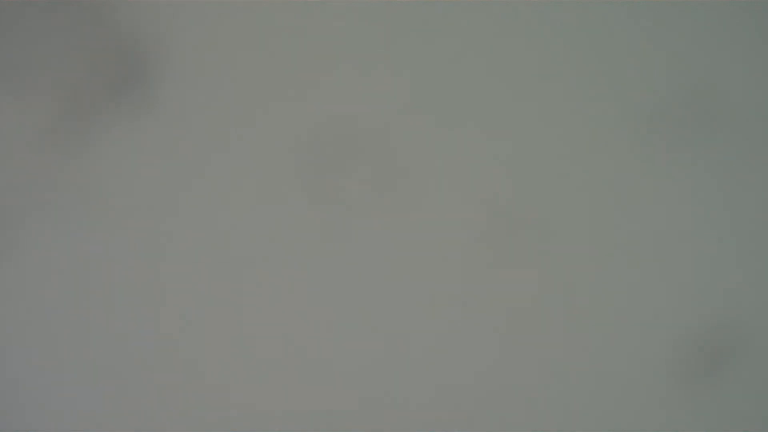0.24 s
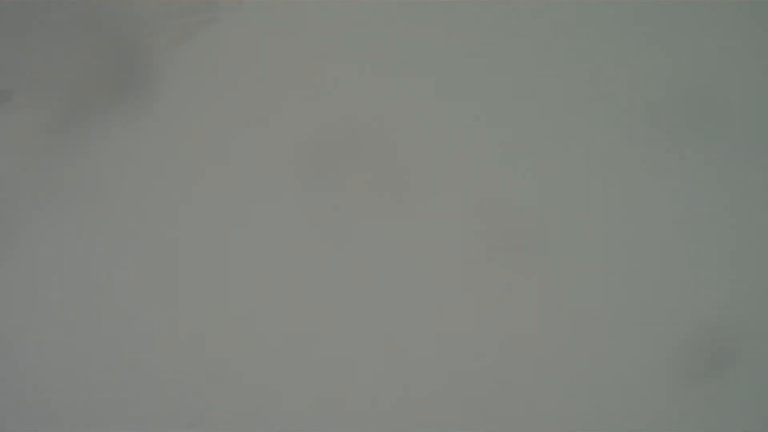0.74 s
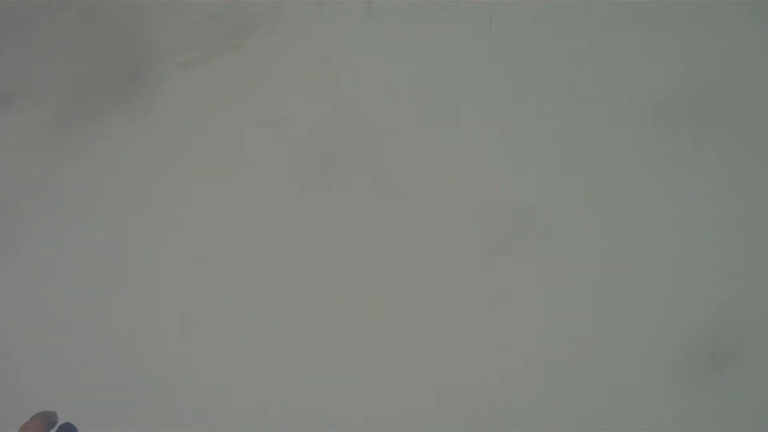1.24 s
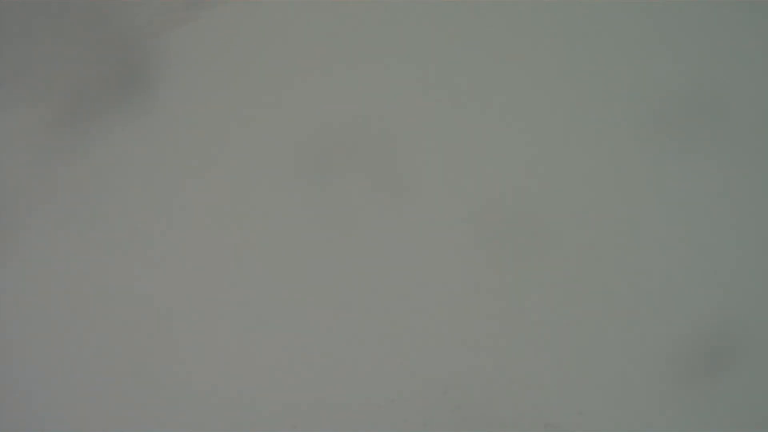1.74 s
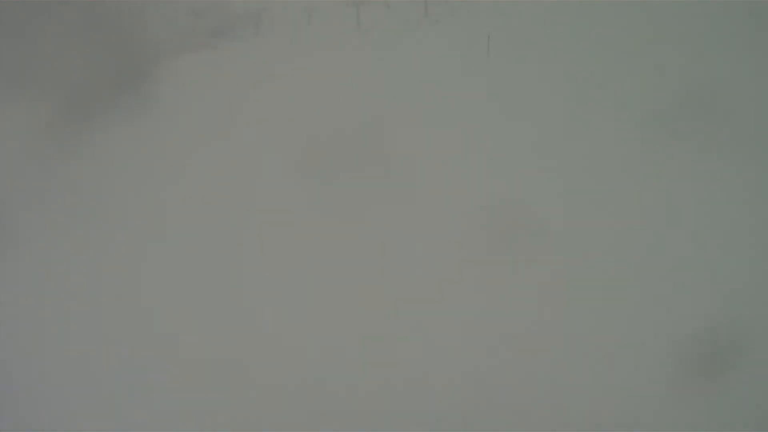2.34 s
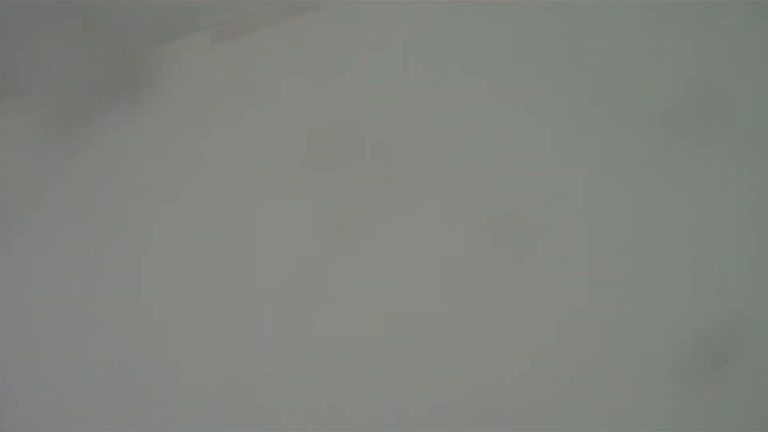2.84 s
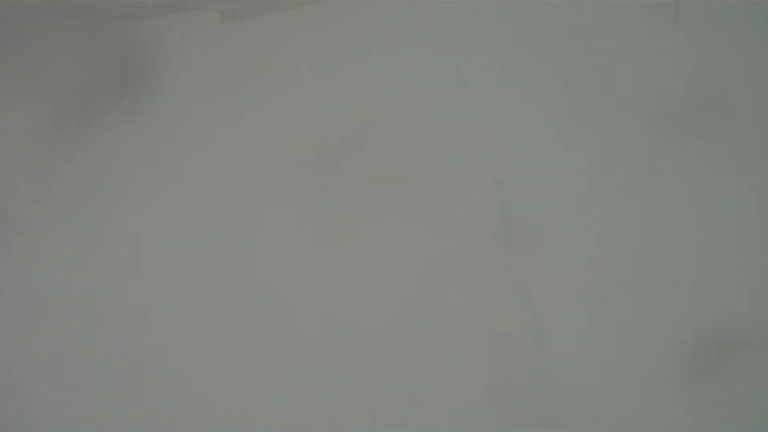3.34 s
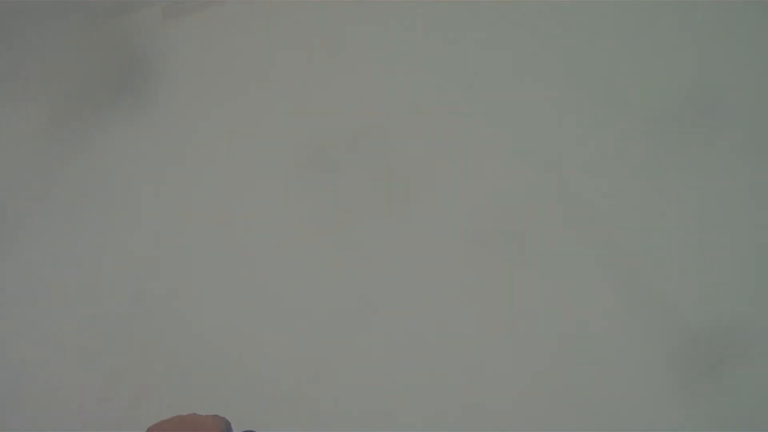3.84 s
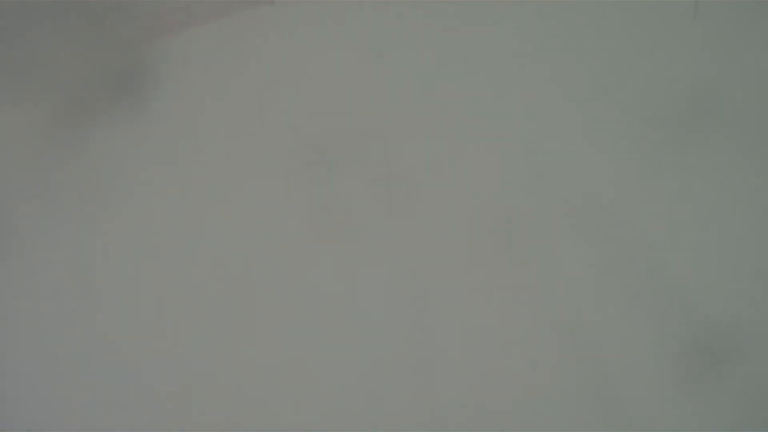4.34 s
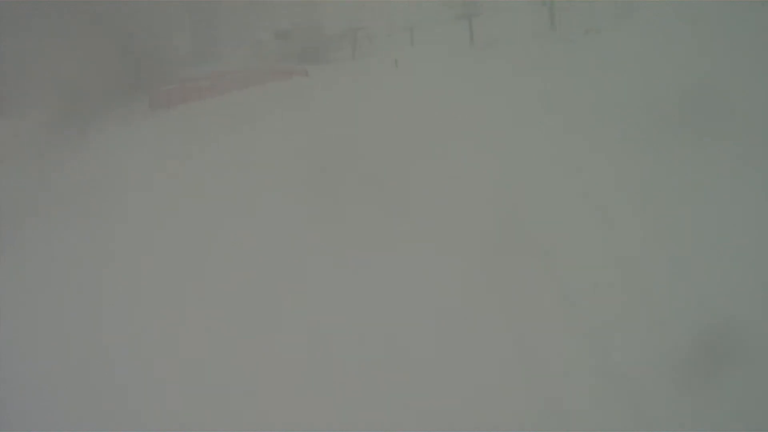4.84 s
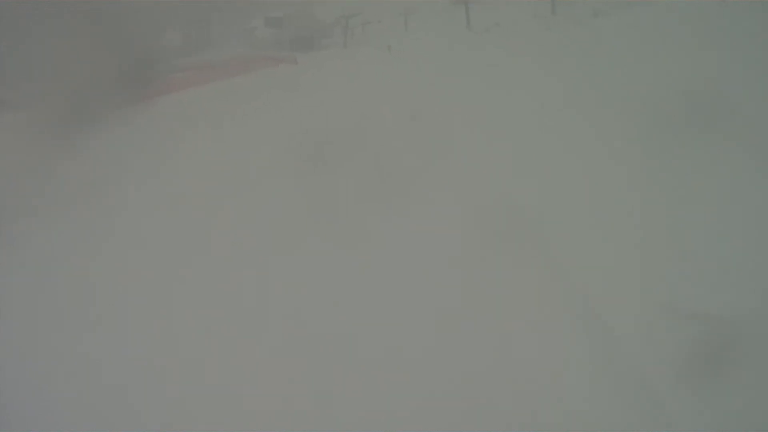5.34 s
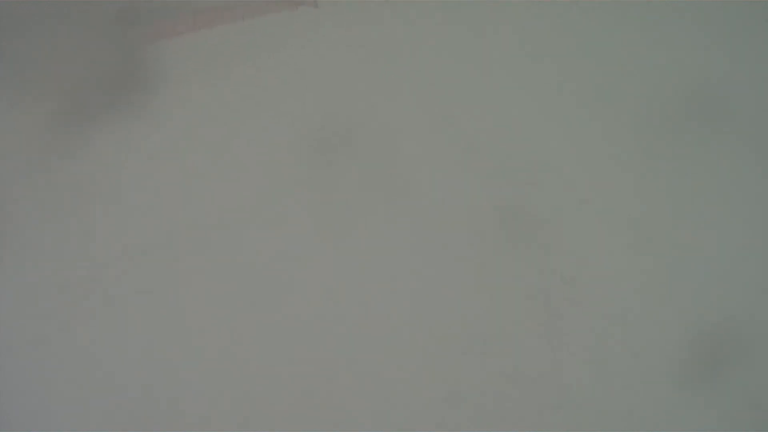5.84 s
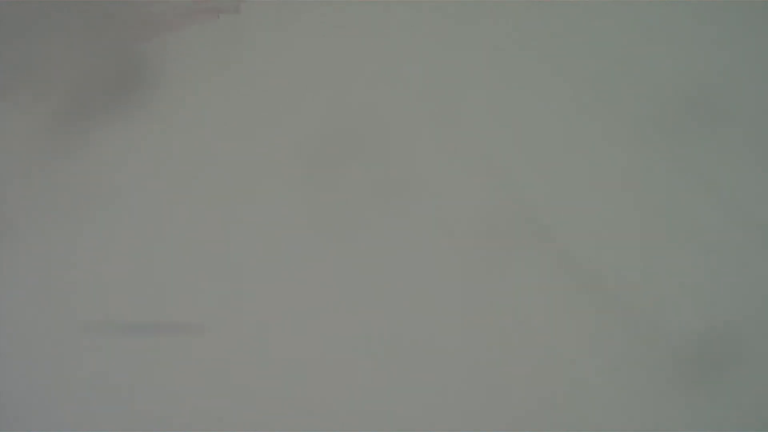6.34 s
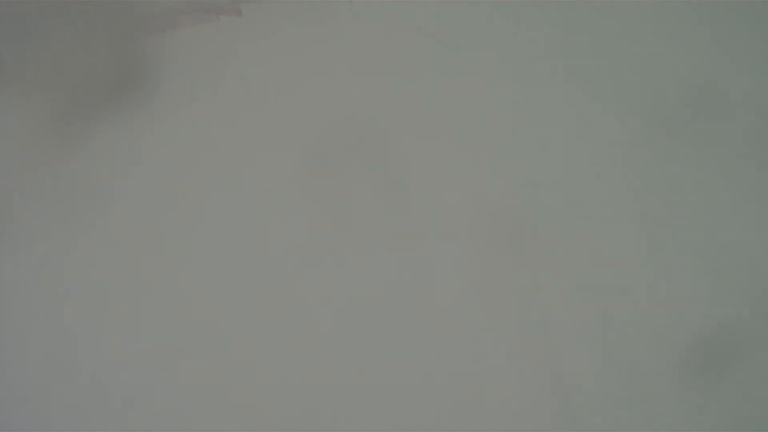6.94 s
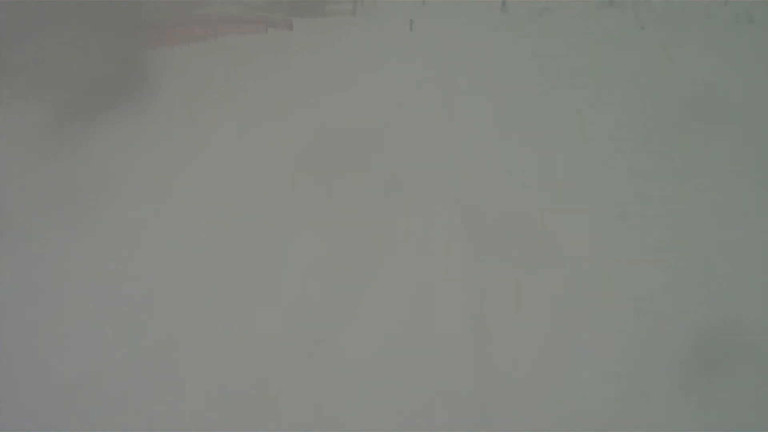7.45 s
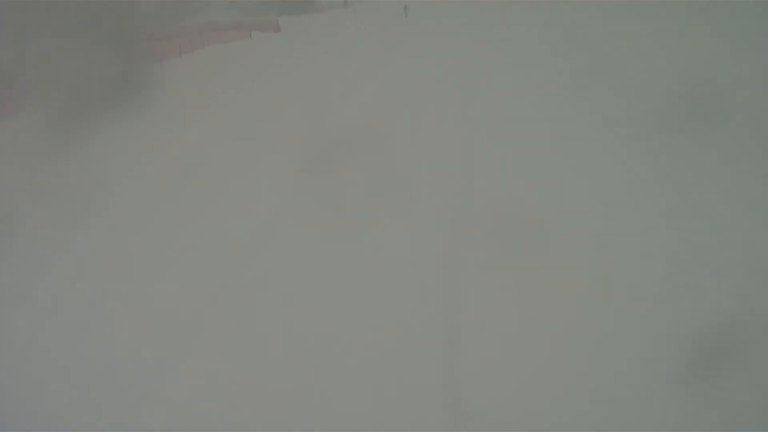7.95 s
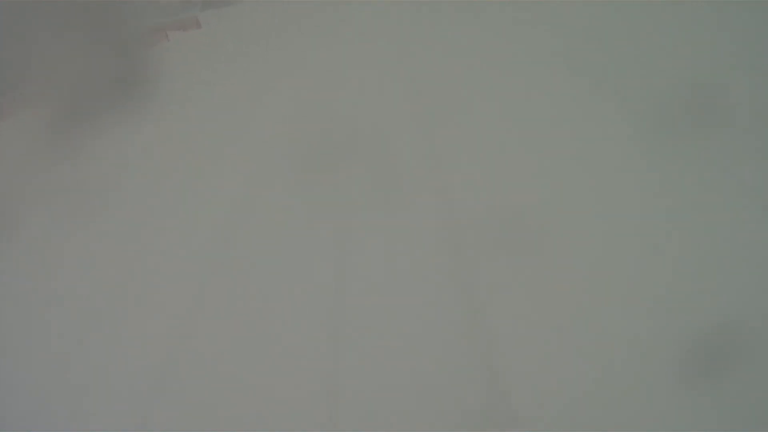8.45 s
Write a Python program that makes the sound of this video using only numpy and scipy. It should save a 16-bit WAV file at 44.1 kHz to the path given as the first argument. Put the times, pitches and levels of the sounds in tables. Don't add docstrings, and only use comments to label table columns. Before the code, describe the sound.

A snowboard scrapes over crusty snow with brittle crackles and a thin hiss, low wind rumble, and hard knocks near two seconds, heard through a sealed housing.

```python
import sys
import numpy as np
from scipy import signal
from scipy.io import wavfile
from scipy.ndimage import uniform_filter1d

SR = 44100
rng = np.random.default_rng(int(sys.argv[2]) if len(sys.argv) > 2 else 0)


def int16_out(signal):
    q = np.round(np.clip(np.atleast_2d(signal).T, -1, 1) * 32767)
    wavfile.write(sys.argv[1], SR, q.astype(np.int16))


def field_ratio(decibels):
    return 10 ** (np.asarray(decibels, dtype=float) / 20)


N = 383669


def rms_one(x):
    return x / np.sqrt(np.mean(x ** 2) + 1e-20)


def noise():
    return rng.standard_normal(N)


def in_time(rows):
    s, db = np.transpose(rows)
    return np.interp(np.arange(N) / SR, s, db)


def drift(rate_hz):
    r = np.exp(-80 * np.pi * rate_hz / SR)
    slow = signal.lfilter([1], [1, -2 * r, r * r], rng.standard_normal(N // 40 + 2002))[2000:]
    return np.interp(np.arange(N) / 40, np.arange(len(slow)), rms_one(slow))


def evened(x, window_s):
    power = uniform_filter1d(rms_one(x) ** 2 + 0.05, round(window_s * SR))
    return rms_one(x / power ** 0.17)


def resonance(x, hz, width_hz):
    r = np.exp(-np.pi * width_hz / SR)
    poles = [1, -2 * r * np.cos(2 * np.pi * hz / SR), r * r]
    return signal.lfilter([(1 - r * r) / 2, 0, (r * r - 1) / 2], poles, x)


def add(out, s, x):
    at = round(s * SR)
    out[at:at + len(x)] += x[:N - at]


# (frequency [Hz], width [Hz], level [dB])
HOUSING_MODES = [(600, 66, -14), (808, 160, -16.5), (1276, 153, -4), (1616, 190, -5), (1998, 474, -2.5),
                 (2435, 660, -1.5), (2800, 633, -4), (3572, 243, -5), (4470, 1200, -6.5), (4854, 1106, -5),
                 (5405, 417, -10.5)]


def housing(x):
    out = 0
    for k, (hz, width_hz, db) in enumerate(HOUSING_MODES):
        out = out + (-1) ** k * field_ratio(db) * resonance(x, hz, width_hz)
    return out


# (time [s], level [dB])
EDGE_LOAD = [(0, -38), (1.0, -38), (1.5, -40), (1.9, -35), (2.18, -46), (2.42, -35.5), (2.55, -42),
             (3.3, -42), (4.1, -39), (5.3, -42), (5.64, -38.5), (5.9, -42), (6.9, -40), (7.15, -43),
             (7.55, -36), (7.75, -46), (8.2, -38), (8.7, -45)]


def edge_load():
    return in_time(EDGE_LOAD)


def crust(crust_db):
    grains_per_s, spread_db, burst_s, snap = 200, 8.0, 0.001, 2.9
    fade = np.exp(-1 / (burst_s * SR))
    sizes = field_ratio(spread_db * np.minimum(rng.exponential(1, N), 1.9))
    born = rng.random(N) < grains_per_s * field_ratio(6.0 * drift(25)) / SR
    tint = rng.integers(0, 6, N)
    out = 0
    for k, hz in enumerate(np.geomspace(900, 5000, num=6)):
        snaps = sizes * born * (tint == k)
        envelope = signal.lfilter([1], [1, -fade], snaps + 1e-18)
        bursts = envelope * noise() + snap * snaps
        out = out + rms_one(resonance(bursts, hz, hz / 1.46))
    return field_ratio(crust_db) * rms_one(housing(out))


# (time [s], level [dB])
STREAM = [(0, -45), (1.75, -44), (2.1, -49.5), (2.45, -49.5), (3.3, -53), (4.5, -53.5), (5.1, -50.5),
          (7.4, -52), (8.7, -56.5)]


def stream():
    return in_time(STREAM)


def spray(spray_db):
    body = rms_one(resonance(noise(), 350, 980))
    hollow = field_ratio(-2) * rms_one(resonance(noise(), 846, 40))
    air = noise()
    bright = field_ratio(14) * rms_one(housing(air + 0.27 * resonance(air, 4670, 470)))
    return field_ratio(spray_db - 5.5 + 2.32 * drift(51)) * (body + hollow + bright)


# (time [s], half length [s], extra shake [dB], extra rumble [dB])
GUSTS = [(0.23, 0.18, 7, 8.5), (0.802, 0.33, 5.5, 4), (1.035, 0.063, 3.5, 4), (1.39, 0.067, 5.5, 2),
         (1.705, 0.19, 2.5, 11.5), (1.939, .12, 7, 23.5), (2.22, .06, 8, 20), (2.41, 0.078, 10, 24),
         (2.722, 0.25, 7.5, 2), (4.842, 0.053, 7, -11), (5.12, 0.076, 4.5, -4), (5.453, 0.036, 10.5, -6),
         (6.49, 0.036, 7, -5), (8.23, 0.092, 3.5, -12)]


def swells():
    s, half_s, shake_db, rumble_db = np.transpose(GUSTS)
    coarse_s = np.arange(0, N + 64, 64) / SR
    bells = np.exp(-((coarse_s[:, None] - s) / half_s) ** 2)
    return [np.interp(np.arange(N) / SR, coarse_s, bells @ db) for db in (shake_db, rumble_db)]


def wind(stream_db):
    swing_db = stream_db - stream_db.mean()
    gust_db, jolt_db = swells()
    shake_db = -46.5 + 0.21 * swing_db + gust_db
    rumble_db = -54.5 + 0.77 * swing_db + jolt_db + 2.0 * drift(24)
    shake = evened(resonance(noise() * field_ratio(4.9 * drift(36)), 98.9, 12), 0.1)
    above = field_ratio(-9.5) * rms_one(resonance(noise() * field_ratio(3.3 * drift(24)), 198, 82))
    band = signal.butter(2, [22, 70], "band", fs=SR, output="sos")
    rumble = evened(signal.sosfilt(band, noise()), 0.39)
    return field_ratio(shake_db) * (shake + above) + field_ratio(rumble_db) * rumble


def breaks(events, crumble_ms, snap, sharpness, broad, body):
    out, t = np.zeros(N), np.arange(SR // 25) / SR
    fade_s = crumble_ms / 1000 * rng.uniform(0.6, 1.4, (len(events), 1))
    envelopes = np.exp(-t / fade_s) * (1 - np.exp(-t / 0.00021)) * (t < 0.03)
    bursts = rng.standard_normal((len(events), len(t))) * envelopes
    bursts[:, 10] += snap
    for (s, db, hz), burst in zip(events, bursts):
        heard = body(resonance(burst, hz, hz / sharpness) + broad * burst)
        add(out, s, field_ratio(db - 1.5) * heard / np.abs(heard).max())
    return out


def lesser_cracks(load_db):
    soft_per_s, hard_per_s, hardens_s, hardens_over_s = 12, 60, 3.0, 0.5
    over_load_db, spread_db, centre_hz, spread_octaves = 17, 3, 2700, 0.56
    quiet_before_s = 0.017
    hard = 1 / (1 + np.exp((hardens_s - np.arange(N) / SR) / hardens_over_s))
    clusters_db = 6.5 * (drift(9.7) - 0.12)
    per_s = soft_per_s + (hard_per_s - soft_per_s) * hard
    due = np.cumsum(per_s * field_ratio(0.6 * (load_db - load_db.mean()) + clusters_db)) / SR
    at = np.searchsorted(due, np.cumsum(rng.exponential(1, 600)))
    size, tint = np.clip(rng.standard_normal((2, 600)), -2, 2)
    clear_s = np.array([row[0] for row in [*PACKED, *CRUSTY, *BLOWS, *CHIPS]])
    events = []
    for i, a, b in zip(at, size, tint):
        whole = np.any(np.abs(clear_s - i / SR - quiet_before_s / 2) < quiet_before_s / 2)
        if i < N and not whole:
            db = load_db[i] + over_load_db + spread_db * a
            events.append((i / SR, db, centre_hz * 2 ** (spread_octaves * b)))
    return breaks(events, 0.59, snap=2.8, sharpness=3.1, broad=0.37, body=housing)


# (time [s], peak [dB], colour [Hz])
PACKED = [(0.111, -15.5, 1700), (0.153, -10, 2070), (0.199, -18, 2050), (0.296, -17, 3520),
          (0.41, -12.5, 2000), (0.439, -6, 3500), (0.68, -20, 2080), (0.86, -11, 1850), (1.07, -11.5, 2100),
          (1.196, -17, 2000), (1.497, -15.5, 1740), (1.56, -12, 2700), (1.624, -16.5, 2230),
          (1.857, -18, 3470), (1.962, -17.5, 1920), (2.156, -12, 1780), (2.247, -11.5, 2030),
          (2.338, -12, 2050), (2.394, -12.5, 2000), (2.545, -14.5, 2030), (2.864, -14.5, 3420),
          (3.033, -16, 2100), (3.5, -17.5, 2040), (3.683, -13, 1650), (3.739, -20, 1940),
          (3.832, -15.5, 3560), (3.984, -21, 2300), (4.111, -16.5, 2090), (4.226, -15.5, 1970),
          (4.278, -23, 2110)]
# (time [s], peak [dB], colour [Hz])
CRUSTY = [(4.463, -18.5, 1700), (4.511, -18.5, 2100), (4.628, -21, 1860), (4.751, -19, 2490),
          (4.835, -13.5, 2000), (4.931, -11, 3610), (5.331, -14.5, 2140), (5.478, -18, 3430),
          (5.532, -11.5, 2780), (5.573, -17.5, 2250), (5.709, -15.5, 3700), (5.793, -14.5, 2110),
          (5.826, -19.5, 3400), (6.188, -11.5, 2300), (6.211, -14, 1500), (6.384, -14.5, 2030),
          (6.457, -13, 2130), (6.64, -10, 1920), (6.672, -15.5, 2630), (6.797, -17, 2690),
          (7.221, -15.5, 2220), (7.367, -14.5, 2220), (7.49, -15, 3680), (7.569, -12.5, 1640),
          (7.652, -14.5, 2000), (7.836, -15, 2300), (8.118, -17, 1950), (8.161, -15, 1820),
          (8.318, -19.5, 1670), (8.43, -17, 2050)]


def clear_cracks():
    return breaks([*PACKED, *CRUSTY], 1.22, snap=3.15, sharpness=3.8, broad=0.53, body=housing)


# (time [s], crack peak [dB], swing [dB], mount ring [dB])
BLOWS = [
    (1.583, -24, -21, -15.5),
    (1.9058, -41, -2.5, -6),
    (2.1024, 8, 8.5, 1.5),
    (2.29, -10.5, -3, -10),
    (2.4648, -6.5, -1, -4.5),
    (4.3496, -9, -2.5, -7),
]
# (frequency [Hz], level [dB], t60 [s])
SHELL = [(600, -12, 0.057), (818, -11, 0.045), (1240, 1, 0.045), (1336, 5.5, 0.016), (1500, -29.5, 0.03),
         (1950, 12, 0.0078), (2300, -4, 0.036), (2700, -23, 0.008)]
# (frequency [Hz], level [dB], t60 [s])
SWING = [(161, 3, 0.024), (300, -33, 0.038)]
# (frequency [Hz], level [dB], t60 [s])
MOUNT = [(102.2, 1, 0.12), (55, -56, 0.027)]


def struck(modes, push):
    t = np.arange(SR // 4) / SR
    rings = sum(field_ratio(db - 60 * t / t60_s) * np.sin(2 * np.pi * hz * t) for hz, db, t60_s in modes)
    return signal.fftconvolve(rings, push / push.sum())[:len(t)]


def blows():
    out = np.zeros(N)
    for s, crack_db, swing_db, ring_db in BLOWS:
        own = [(hz * rng.normal(1, 0.03), db + rng.normal(0, 3), min(t60_s, 0.021)) for hz, db, t60_s in SHELL]
        add(out, s, field_ratio(crack_db - 5.5) * struck(own, np.hanning(17)))
        add(out, s + 0.00032, -field_ratio(swing_db + 0.5) * struck(SWING, np.hanning(41)))
        add(out, s + 0.0022, field_ratio(ring_db) * struck(MOUNT, np.hanning(101)))
    for _ in range(2):
        out -= resonance(out, 462, 144)
    return out


# (time [s], peak [dB], colour [Hz])
TAPS = [
    (1.659, -20, 790),
    (8.587, -19, 1250),
]


def buckle_taps():
    return breaks(TAPS, 1.6, snap=4.0, sharpness=5.7, broad=0, body=lambda x: resonance(x, 950, 1200))


# (time [s], peak [dB], direction [sign])
PUSHES = [
    (1.749, -32, -1),
    (1.87, -37, -1),
    (1.899, -12, 1),
    (1.947, -24, -1),
    (2.084, -19, -1),
    (6.465, -35, -1),
    (8.223, -35, -1),
]


def pushes():
    out = np.zeros(N)
    for s, db, direction in PUSHES:
        add(out, s, np.sign(direction) * field_ratio(db + 11.5) * struck(MOUNT, np.hanning(301)))
    return out


# (time [s], peak [dB], colour [Hz])
SCUFFS = [(1.8985, -8, 3600), (1.902, 0.5, 2800), (1.903, -24, 2300), (2.04, -18, 2490), (2.107, 0, 1900),
          (2.223, -18.5, 2130), (2.267, -20, 2550), (2.415, -16, 3020), (2.448, -21, 2560),
          (2.607, -21, 2700), (4.334, -15, 1750), (4.381, -38, 1920), (4.418, -21, 3420),
          (6.197, -18, 2700), (6.201, -16, 2640), (8.146, -20, 2800), (8.168, -12, 1960)]


def glove_scuffs():
    return breaks(SCUFFS, 1.22, snap=3.15, sharpness=3.8, broad=0.53, body=housing)


# (time [s], peak [dB], colour [Hz])
LUMPS = [(2.268, -20, 250), (3.282, -21.5, 300), (4.932, -23, 367), (5.064, -19, 600), (5.441, -20.5, 272),
         (5.803, -20, 500), (6.058, -16.5, 600), (6.491, -18.5, 510), (6.641, -18, 396), (6.803, -24, 398),
         (7.356, -24, 396), (7.653, -23.5, 300)]


def snow_lumps():
    return breaks(LUMPS, 1.9, snap=3.1, sharpness=0.74, broad=0, body=lambda x: resonance(x, 970, 2800))


# (time [s], peak [dB], colour [Hz])
CHIPS = [
    (3.1087, -15, 4670),
    (4.2263, -22, 4600),
    (4.9317, -20, 4630),
    (6.179, -23, 4810),
    (7.279, -21, 4700),
    (8.5874, -19, 5600),
]


def ice_chips():
    return breaks(CHIPS, 2.2, snap=1.27, sharpness=3.3, broad=0, body=lambda x: resonance(x, 3300, 3000))


def scene():
    load_db, stream_db = edge_load(), stream()
    slide = crust(load_db - 2) + spray(stream_db) + wind(stream_db)
    cracks = lesser_cracks(load_db) + clear_cracks()
    contacts = blows() + buckle_taps() + pushes() + glove_scuffs() + snow_lumps() + ice_chips()
    return (slide + cracks + contacts)[None]


def gain_control(x):
    limit_db, release_db_per_s, attack_s = -5, 130, 0.006
    over_db = np.maximum(20 * np.log10(np.abs(x) + 1e-9) - limit_db, 0)
    climb_db = release_db_per_s * np.arange(N) / SR
    held_db = np.maximum.accumulate(over_db + climb_db, axis=1) - climb_db
    r = np.exp(-1 / (attack_s * SR))
    return x * field_ratio(-signal.lfilter([1 - r], [1, -r], held_db))


def low_pass(x):
    return signal.sosfilt(signal.butter(12, 16230, fs=SR, output="sos"), x)


def record(dry):
    cutoff_hz = 15230
    sampled = signal.resample_poly(gain_control(dry), 40, 147, axis=1)
    clipped = np.clip(sampled, -0.97, 0.97)
    held = signal.resample_poly(np.repeat(clipped, 4, axis=1), 147, 160, axis=1)[:, :N]
    step = signal.ellip(8, 0.1, 25, cutoff_hz, fs=SR, output="sos")
    below = signal.sosfiltfilt(step, held)
    stepped = below + field_ratio(-14) * (held - below)
    slope = signal.cheby1(6, 0.5, cutoff_hz, fs=SR, output="sos")
    return low_pass(signal.sosfilt(slope, stepped))


dry = scene()
out = record(dry)
int16_out(out)
```